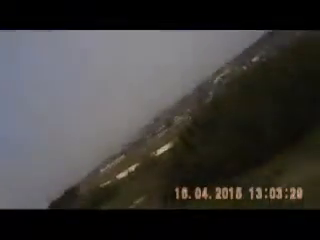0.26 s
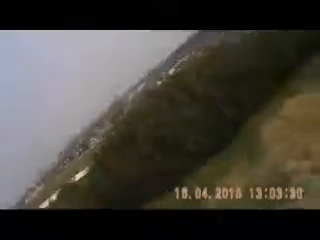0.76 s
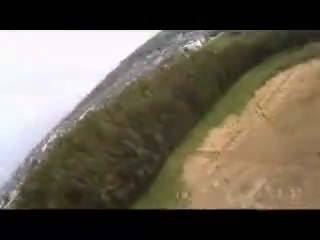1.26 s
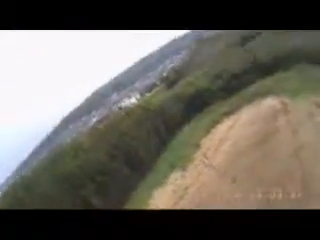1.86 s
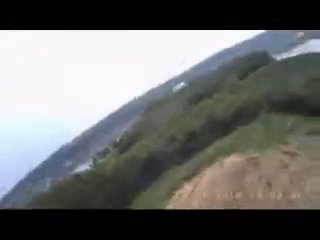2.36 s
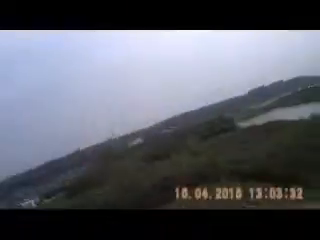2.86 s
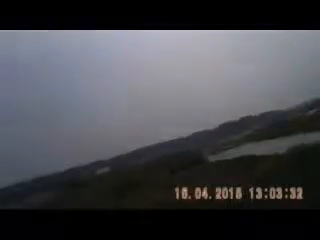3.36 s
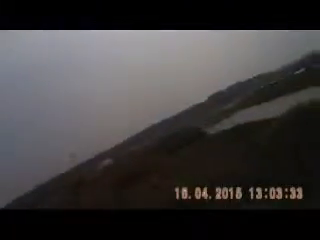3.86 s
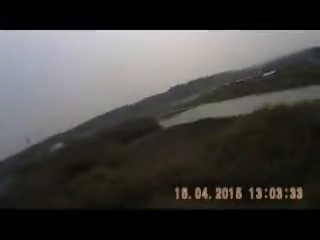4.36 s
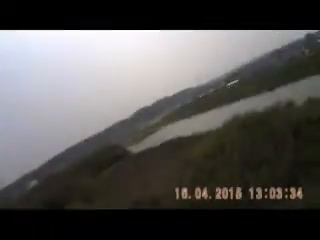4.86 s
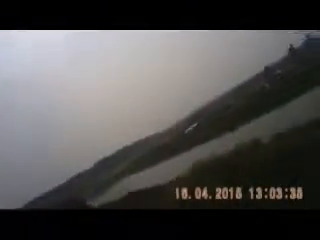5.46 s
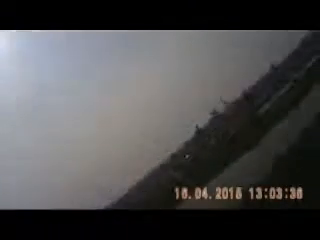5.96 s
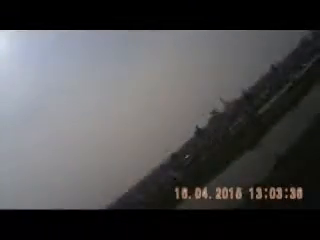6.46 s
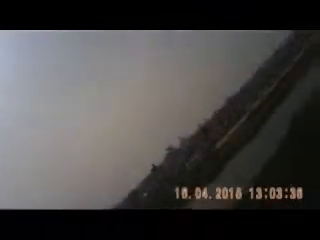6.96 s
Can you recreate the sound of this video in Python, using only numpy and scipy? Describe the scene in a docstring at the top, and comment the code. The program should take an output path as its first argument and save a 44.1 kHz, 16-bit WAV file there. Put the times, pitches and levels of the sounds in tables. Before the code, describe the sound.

On board a small model aircraft, low turbulent wind roars and hisses, starting with a hard gust thump and scattered plastic ticks. After almost four seconds the electric motor starts with stuttering chirps and a yelping whine, then settles into a rough propeller buzz with a rattling shell. Near the end it steps up a little in pitch. Cheap, gritty, close camera microphone outdoors.

```python
"""Model aircraft heard from on board

Turbulent airflow roars and hisses, gusts thump the camera and loose parts tick. The motor spins up: current surges
chirp, and its magnetic whine yelps as it sweeps through the airframe's resonances. The unbalanced propeller drones as a
harmonic series and knocks the shell once a turn, in its own wash; later the throttle opens a little more. The camera
clips and samples coarsely, and joining its samples by straight lines mirrors the sound into the treble."""
import sys
import numpy as np
from scipy import signal
from scipy.fft import rfft, irfft
from scipy.io import wavfile
from scipy.ndimage import map_coordinates

SR = 44100
rng = np.random.default_rng(int(sys.argv[2]) if len(sys.argv) > 2 else 0)


def put_to_file(sound):
    """Save the sound as 16-bit audio at rate SR, in the file named by the first command-line argument."""
    columns = np.atleast_2d(sound).T  # one column per channel
    safe = np.clip(columns, -1, 1)
    whole_steps = np.round(safe * 32767)
    wavfile.write(sys.argv[1], SR, whole_steps.astype(np.int16))


N = 318843
TIME = np.arange(N) / SR  # s

# airflow, swelling as the aircraft banks: (time [s], relative buffeting level [dB], relative hiss level [dB])
AIRFLOW = [(0.1, -22.5, -40), (0.76, -23.5, -39), (1.05, -21, -36), (1.98, -23.5, -38.5),
           (2.31, -23.5, -38), (2.64, -24.5, -41.5), (3.16, -20.5, -40), (3.76, -24, -43.5),
           (3.95, -23, -43), (4.05, -23, -39)]
# spectrum of the airflow's hiss: (frequency [Hz], relative density [dB per Hz])
HISS_SPECTRUM = [(700, 10.5), (1100, 3.5), (1700, 0), (2200, -6), (2800, -6), (3400, -9.5), (4000, -17)]
# spectrum of rattling contacts: (frequency [Hz], relative density [dB per Hz])
RATTLE_SPECTRUM = [(500, 6), (800, 0), (1200, 2), (1750, -3.5), (2250, 3.5), (2800, 4), (3300, -2),
                   (3900, -6)]
# spectrum of the loose parts' bright rustle: (frequency [Hz], relative density [dB per Hz])
RUSTLE_SPECTRUM = [(2600, -15), (3400, -1.5), (3900, 1.5)]
# wing and mount resonances: (frequency [Hz], bandwidth [Hz], gain [dB])
MOUNT_MODES = [(703, 13, 29), (795, 20.7, 32), (953, 35, 19.5), (967, 9, 25.5), (1075, 8.1, 4)]
# fuselage shell resonances: (frequency [Hz], bandwidth [Hz], gain [dB])
SHELL_MODES = [(950, 85, 8.5), (1740, 490, -6.5), (1900, 130, -3), (2630, 88, 7), (3020, 310, 4),
               (3190, 11, -4.5), (3630, 140, -10)]

POLES, PHASES = 14, 3  # magnet poles and winding phases of the motor
CRUISE, FULL = 86.5, 93.0  # turns per s at cruise and at full throttle
START_S = 3.88  # the motor starts
CAMERA_RATE = 8000  # samples per s


def from_db(db):
    """Decibels to amplitude ratio."""
    return 10 ** (np.asarray(db) / 20)


def rms_one(x):
    """Normalise to unit mean power."""
    return x / np.sqrt(np.mean(x ** 2) + 1e-20)


def in_time(rows):
    """Linear interpolation of each column of a curve over time."""
    s, *columns = np.transpose(rows)
    return [np.interp(TIME, s, c) for c in columns]


def drift(rate_hz):
    """Low-passed Gaussian noise: a slow random fluctuation of rms 1."""
    hz = np.arange(N // 2 + 1) * SR / N
    spectrum = rfft(rng.standard_normal(N)) / (1 + (hz / rate_hz) ** 2)
    return rms_one(irfft(spectrum, N))


def noise(density):
    """Spectral shaping: coloured noise of rms 1, falling off past the ends of its table."""
    hz = np.arange(1, N // 2 + 2) * SR / N
    points, level_db = np.transpose(density)
    gain = from_db(np.interp(np.log(hz), np.log(points), level_db))
    gain *= np.minimum(hz / points[0], 1) ** 2
    gain *= np.minimum(points[-1] / hz, 1) ** 10
    return rms_one(irfft(rfft(rng.standard_normal(N)) * gain, N))


def resonate(x, modes):
    """Modal superposition: parallel two-pole resonances with alternating signs."""
    out = np.zeros(N)
    for k, (hz, width_hz, level_db) in enumerate(modes):
        radius = np.exp(-np.pi * width_hz / SR)
        zeros = [(1 - radius ** 2) / 2, 0, (radius ** 2 - 1) / 2]
        poles = [1, -2 * radius * np.cos(2 * np.pi * hz / SR), radius ** 2]
        # the tiny offset avoids slow arithmetic in decaying tails
        out += (-1) ** k * from_db(level_db) * signal.lfilter(zeros, poles, x + 1e-18)
    return out


def decay(x, fade_s):
    """First-order relaxation: every impulse starts an exponential decay."""
    return signal.lfilter([1], [1, -np.exp(-1 / (fade_s * SR))], x + 1e-18)


def wind(buffet_db=3.5, hiss_db=7.0, lump_db=1.55, flutter_db=0.66, eddy_hz=35, bass_hz=190,
         gust_db=0.4, gust_hz=7):
    """Turbulence: eddies modulate a lumpy roar and, in step with it, a fluttering hiss."""
    # spectrum of the buffeting: (frequency [Hz], relative density [dB per Hz])
    buffet_spectrum = [(12, -36), (20, -39), (38, -4), (92, -4), (166, -1), (241, 0), (396, -4.5),
                       (449, -6), (517, -10), (586, -11), (779, -15), (914, -22), (1400, -45), (1820, -59),
                       (3080, -120)]
    # the airflow deepens in the turn: (time [s], bass gain [dB])
    bass_curve = [(0, -5), (0.9, -1.5), (1.4, -3), (1.85, 0), (2.5, 0), (3.1, -5.5), (3.8, -1), (4.5, -10)]
    # one strong gust swells the roar: (time [s], half-length [s], swell [dB])
    strong_gust = (0.043, 0.048, 6.5)
    roar_db, air_db = in_time(AIRFLOW)
    eddies = drift(eddy_hz)
    gust_s, half_s, swell_db = strong_gust
    gusts_db = gust_db * drift(gust_hz) + swell_db * np.exp(-.5 * ((TIME - gust_s) / half_s) ** 2)
    roar = from_db(roar_db + buffet_db + lump_db * eddies + gusts_db) * noise(buffet_spectrum)
    bass = signal.sosfiltfilt(signal.butter(2, bass_hz, fs=SR, output="sos"), roar)
    roar += (from_db(in_time(bass_curve)[0]) - 1) * bass
    hiss = from_db(air_db + hiss_db + flutter_db * eddies) * noise(HISS_SPECTRUM)
    return roar + hiss


def thumps(creak_db=-25.5, creak_s=0.0086):
    """Impulse response: hard gusts shove the camera, whose modes shudder briefly while it creaks."""
    # gusts: (time [s], relative shove level [dB])
    shove_list = [(0.053, 5), (0.071, 0), (0.152, -8), (0.958, -10.5), (2.478, -7.5), (2.966, -9.5),
                  (3.016, -8), (3.143, -9), (3.208, -9), (3.369, -8.5), (3.447, -8), (3.571, -9),
                  (3.712, -11)]
    # the camera on its mount: (frequency [Hz], bandwidth [Hz], gain [dB])
    camera_modes = [(278, 44, 2.5), (357, 110, -4), (688, 31.5, -5.5)]
    shoves = np.zeros(N)
    for s, db in shove_list:
        shoves[int(s * SR)] = from_db(db)
    one_shudder = resonate(signal.unit_impulse(N), camera_modes)
    shudder = resonate(shoves, camera_modes) / np.max(abs(one_shudder))
    creak = decay(shoves, creak_s) * noise(HISS_SPECTRUM)
    return shudder + from_db(creak_db) * creak


def small_ticks(per_s=12, level_db=-39.5, spread_db=1.5, fade_s=0.0052):
    """Poisson process: light touches of the loose parts at random times, harder in faster air."""
    _, air_db = in_time(AIRFLOW)
    strength_db = level_db + air_db - air_db.mean() + spread_db * rng.standard_normal(N)
    touches = (rng.random(N) < per_s / SR) * from_db(strength_db)
    return decay(touches, fade_s) * noise(RUSTLE_SPECTRUM)


def ticks(scuff_s=0.0036, rustle_db=8.0, rustle_s=0.0064, rustle_rise_s=0.001):
    """Transient friction: a loose part scuffs the shell and shivers, as decaying bursts of noise."""
    # ticks: (time [s], scuff level [dB], relative rustle level [dB])
    tick_list = [(0.0492, -15, -42), (0.1122, -31, -32), (0.1986, -31, -45), (0.242, -29.5, -46),
                 (0.2643, -26, -53), (0.2872, -36, -36), (0.375, -22, -42), (0.397, -26, -39),
                 (0.5062, -23.5, -43), (0.9455, -17, -39), (0.9901, -22.5, -42), (1.0136, -20, -45),
                 (1.4972, -24.5, -35), (1.8483, -20.5, -37), (1.8685, -22.5, -51), (1.9844, -32, -44),
                 (2.1994, -34, -39), (2.2228, -39, -39), (2.5095, -30, -46), (2.9262, -28, -50),
                 (3.6526, -29, -49), (3.9007, -30, -51)]
    scuffs, rustles = np.zeros(N), np.zeros(N)
    for s, scuff_db, shiver_db in tick_list:
        start = int(s * SR)
        age = TIME[:min(SR // 10, N - start)]
        span = slice(start, start + len(age))
        scuffs[span] += from_db(scuff_db) * np.exp(-age / scuff_s)
        rise = 1 - np.exp(-age / rustle_rise_s)
        rustles[span] += from_db(shiver_db) * rise * np.exp(-age / rustle_s)
    return scuffs * noise(RATTLE_SPECTRUM) + from_db(rustle_db) * rustles * noise(RUSTLE_SPECTRUM)


def wash(speed, level_db=-20.0, lump_db=1.5, lump_hz=30):
    """Propeller wash: turbulent noise whose amplitude grows as the square of the speed."""
    # spectrum of the wash: (frequency [Hz], relative density [dB per Hz])
    wash_spectrum = [(35, -11), (100, -1.5), (200, -1), (290, 1), (420, -12.5), (580, -19.5), (770, -3),
                     (950, -10.5), (1150, -25.5)]
    return from_db(level_db + lump_db * drift(lump_hz)) * (speed / CRUISE) ** 2 * noise(wash_spectrum)


def starting_current(attack_s=0.029, start_db=-39.5, rise_db_per_s=36, caught_s=4.18, fall_db_per_s=398.5,
                     surge_s=0.006):
    """Starting load: current grows while the rotor labours, surges, and falls once it has caught."""
    # surges: (time [s], peak level [dB])
    surge_list = [(4.098, -20.5), (4.127, -22), (4.141, -25), (4.182, -35)]
    age = TIME - START_S
    level_db = start_db + rise_db_per_s * age - fall_db_per_s * np.maximum(TIME - caught_s, 0)
    surges = sum(from_db(db) * np.exp(-.5 * ((TIME - s) / surge_s) ** 2) for s, db in surge_list)
    return np.clip(age / attack_s, 0, 1) * from_db(level_db) + surges


def stutter(turns, chirp_db=-8.0, scrape_db=-6.5, shell_db=-9.0, groan_db=-30, groan_limit_db=-42):
    """Amplitude modulation by current: switching harmonics chirp, shell scrapes and mount groans."""
    # chirp: (multiple of the switching rate [1], relative level [dB])
    chirp_tones = [(1, 0), (2, -2), (3, -6)]
    current = starting_current()
    steps = POLES * PHASES * turns + .08 * drift(40)  # cycles of switching, with jitter
    chirps = sum(from_db(db) * np.sin(2 * np.pi * k * steps) for k, db in chirp_tones)
    chirps = chirps - from_db(shell_db) * resonate(chirps, SHELL_MODES)
    scrape = rms_one(resonate(noise(RATTLE_SPECTRUM), SHELL_MODES))
    groan_level = from_db(groan_db) * np.tanh(current / from_db(groan_limit_db))  # saturates
    groan = groan_level * rms_one(resonate(noise(RATTLE_SPECTRUM), MOUNT_MODES))
    return current * (from_db(chirp_db) * chirps + from_db(scrape_db) * scrape) + groan


def whine(turns, speed, throttle, waver_db=0.66, waver_hz=7.6, onset_speed=46, chop_hz=7605, beat_db=-42,
          beat_flutter_db=3.5):
    """Forced vibration: magnetic tones follow the speed; the pole tone yelps crossing mount modes."""
    # pole tone: (level at cruise [dB], level at full throttle [dB])
    pole_db = (-29.5, -34.5)
    # switching tone: (level at cruise [dB], level at full throttle [dB])
    switching_db = (-37, -36.5)
    # the motor's bell: (frequency [Hz], bandwidth [Hz], gain [dB])
    bell_modes = [(3296, 170, 3.5)]

    def tone(cycles, level_db):
        """Sinusoid of the given rms level, wavering slowly."""
        return from_db(level_db + waver_db * drift(waver_hz)) * np.sqrt(2) * np.cos(2 * np.pi * cycles)

    pull = np.clip(speed / onset_speed, 0, 1) ** 4
    steps = POLES * PHASES * turns
    pole = pull * tone(POLES * turns, np.interp(throttle, [0, 1], pole_db))
    switching = pull * tone(steps, np.interp(throttle, [0, 1], switching_db))
    # the speed controller chops the current; its beat with the switching comes out as the throttle opens
    beat = throttle * tone(chop_hz * TIME - steps, beat_db + beat_flutter_db * drift(25))
    return pole + resonate(pole, MOUNT_MODES) + switching + resonate(switching, bell_modes) + beat


def rattle(turns, throttle, rattle_db, snap_db=-2.5, snap_hz=1100, ring_db=-2.0, chatter_db=4.0, uneven_db=1.5,
           rebound_db=-1, settle_turns=0.43, rest=0.27, recurring_db=-7):
    """Periodic impact excitation: the shell is knocked each turn, rebounds, rings and chatters on."""
    # delay of the rebound: (at cruise [turns], at full throttle [turns])
    rebound_turns = (0.28, 0.12)

    def once_a_turn(count):
        """Impulse train of uneven strength, one impulse for each whole turn."""
        return np.diff(np.floor(np.maximum(count, 0)), prepend=0) * from_db(uneven_db * rng.standard_normal(N))

    delay = np.interp(throttle, [0, 1], rebound_turns)
    knocks = once_a_turn(turns)
    knocks = knocks + from_db(rebound_db) * once_a_turn(turns - delay + .01 * drift(60))
    running = turns > 20
    snap = signal.sosfilt(signal.butter(1, [snap_hz, 3500], "band", fs=SR, output="sos"), knocks)
    snap = signal.sosfilt(signal.butter(4, CAMERA_RATE / 2, fs=SR, output="sos"), snap)
    ring = resonate(knocks, SHELL_MODES)
    struck = from_db(snap_db) * snap / np.std(snap[running]) + from_db(ring_db) * ring / np.std(ring[running])
    # the same small contacts recur on every turn, among others that fall at random
    phase = turns % 1
    contacts = resonate(noise(RATTLE_SPECTRUM), SHELL_MODES[1:])
    recurring = np.interp(phase * SR / CRUISE, np.arange(N), contacts) * running
    recurring = rms_one(recurring) * np.sqrt(np.mean(running))
    random_contacts = noise(RATTLE_SPECTRUM) * from_db(1.0 * drift(40))
    settling = rms_one(rest + np.exp(-phase / settle_turns))
    chatter = settling * (random_contacts + from_db(recurring_db) * recurring)
    return from_db(rattle_db) * (struck + from_db(chatter_db) * chatter)


def drone(turns, throttle, hum_db, waver_db=2.0, sway_hz=4):
    """Harmonic series of an unbalanced rotor: overtones shift with throttle and waver in turbulence."""
    # harmonics at cruise: (multiple of the turning rate [1], relative level [dB])
    cruise_harmonics = [(1, 2.5), (2, -5), (3, -3.5), (4, -11), (5, -19), (6, -15), (7, -10.5), (8, -13),
                        (9, -16.5), (10, -9.5), (11, -9.5), (12, -12), (13, -12)]
    # harmonics at full throttle: (multiple of the turning rate [1], relative level [dB])
    full_harmonics = [(1, 1), (2, -8), (3, -7), (4, 0.5), (5, -40), (6, -17.5), (7, -10.5), (8, -13.5),
                      (9, -29), (10, -11.5), (11, -9.5), (12, -13.5), (13, -8)]
    out = np.zeros(N)
    for k, (cruise, full) in enumerate(zip(cruise_harmonics, full_harmonics), 1):
        level_db = cruise[1] + throttle * (full[1] - cruise[1])
        loose = k > 1  # the fundamental stays firm
        lag = loose * .8 * rng.standard_normal()  # rad
        out += from_db(level_db + loose * waver_db * drift(sway_hz)) * np.cos(2 * np.pi * k * turns + lag)
    return np.sqrt(2) * from_db(hum_db) * out


def motor(spin_up_s=0.284, cruise_hum_db=-20.5, hum_db_per_turn_rate=0.46, grip_speed=64, full_grip_speed=72,
          rattle_speed=62, sway_db=1.26, shake_db=1.13):
    """Rotational source: one turning speed drives the drone, rattle, whine, stutter and wash."""
    # speed set by the throttle, reached after the spin-up: (time [s], speed [turns per s])
    set_speed = [(4.4, 84.1), (4.57, 85.3), (5.05, 86.6), (5.37, 86.8), (5.76, 86.5), (6.31, 87.2),
                 (6.44, 91.6), (6.54, 92.8), (6.68, 93.2), (7.2, 92.9)]
    # rattling of the fuselage: (time [s], relative level [dB])
    shake_curve = [(4.3, -29), (5.01, -26.5), (5.16, -28), (6.41, -26), (7.06, -26), (7.1, -26)]
    # 63 % of the set speed is reached after spin_up_s
    spin_up = 1 - np.exp(-(np.maximum(TIME - START_S, 0) / spin_up_s) ** 3)
    speed = spin_up * in_time(set_speed)[0]
    throttle = np.clip((speed - CRUISE) / (FULL - CRUISE), 0, 1)  # 0 at cruise, 1 at full
    turns = np.cumsum(speed * (1 + .001 * drift(12))) / SR
    hum_db = cruise_hum_db + hum_db_per_turn_rate * (speed - CRUISE) + sway_db * drift(23)
    rattle_db = shake_db + in_time(shake_curve)[0]
    shaking = np.interp(speed, [grip_speed, full_grip_speed], [0, 1])  # unbalance bites near working speed
    loosened = np.clip(speed / rattle_speed, 0, 1) ** 4  # the shell starts to rattle sooner
    airframe = shaking * drone(turns, throttle, hum_db) + loosened * rattle(turns, throttle, rattle_db)
    return airframe + whine(turns, speed, throttle) + stutter(turns) + wash(speed)


def scene():
    """Linear superposition of all sources, heard from on board."""
    return (wind() + thumps() + small_ticks() + ticks() + motor())[None]


def record(dry, faint_hiss_db=-72, cutoff_hz=15400):
    """Sampling images: clipped coarse samples joined by straight lines mirror sound into the treble."""
    # spectrum of a faint, steady high hiss: (frequency [Hz], relative density [dB per Hz])
    faint_hiss_spectrum = [(10000, 0), (15000, -1)]
    instants = np.arange(0, N / SR, 1 / CAMERA_RATE)
    samples = map_coordinates(dry[0], [instants * SR], order=3, mode="nearest")
    samples = np.clip(samples, -1, 1)  # overload
    # work at four times the output rate, then low-pass and keep every fourth sample
    fine = np.interp(np.arange(4 * N) / (4 * SR), instants, samples)
    fine += from_db(faint_hiss_db) * np.repeat(noise(faint_hiss_spectrum), 4)
    low_pass = signal.ellip(10, .1, 90, cutoff_hz, fs=4 * SR, output="sos")
    return signal.sosfilt(low_pass, fine)[None, ::4]


dry = scene()
out = record(dry)
put_to_file(out)
```